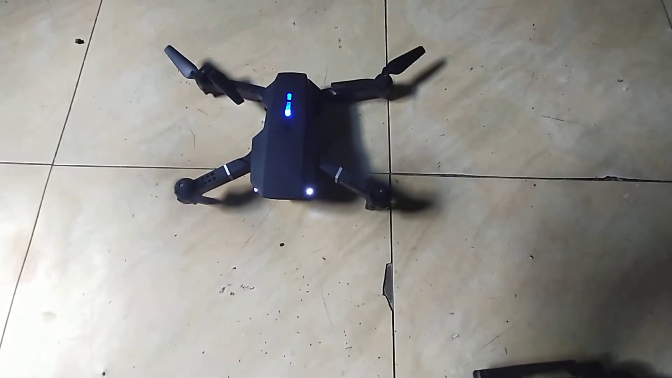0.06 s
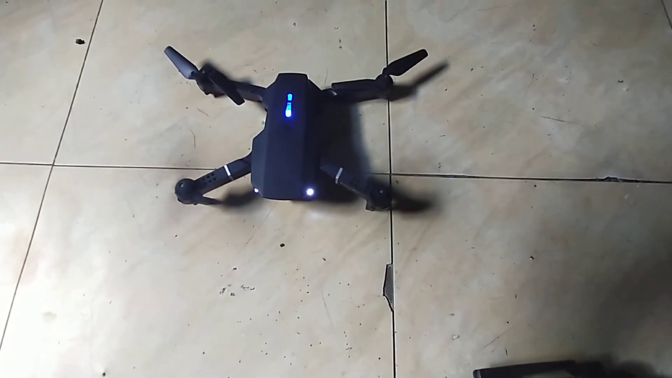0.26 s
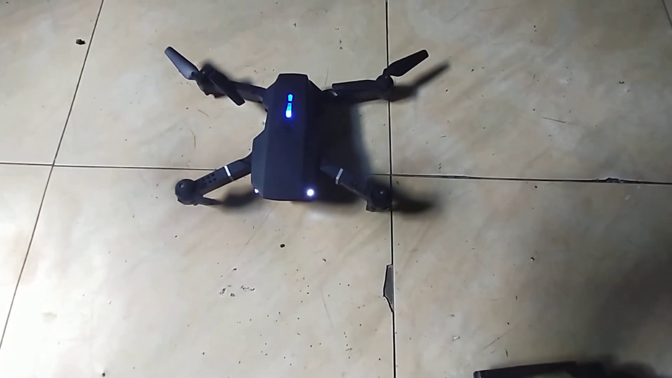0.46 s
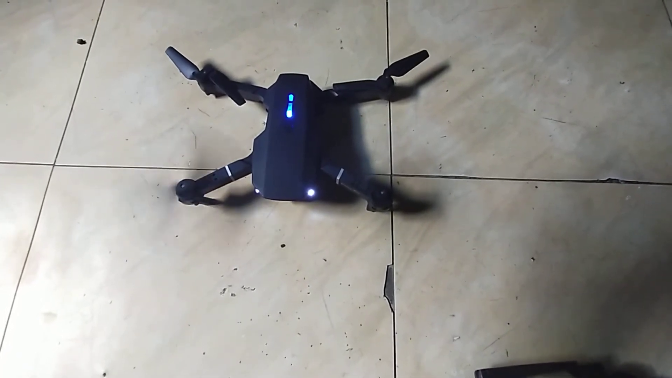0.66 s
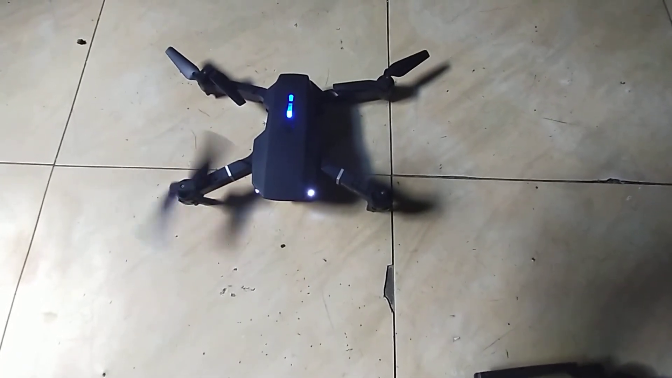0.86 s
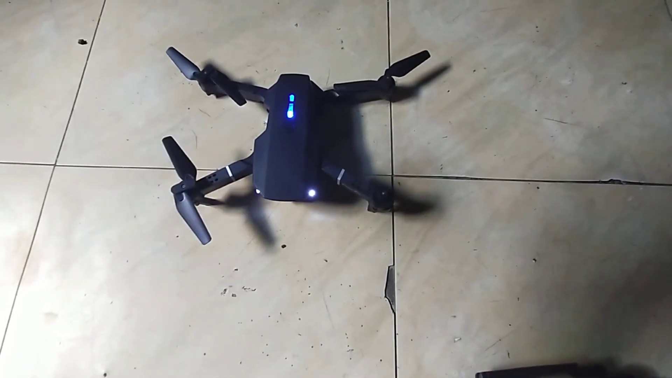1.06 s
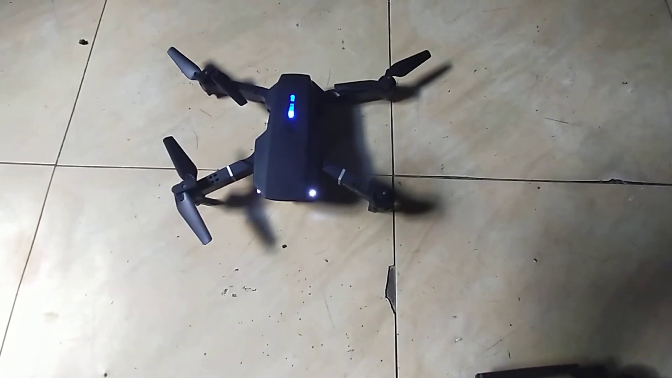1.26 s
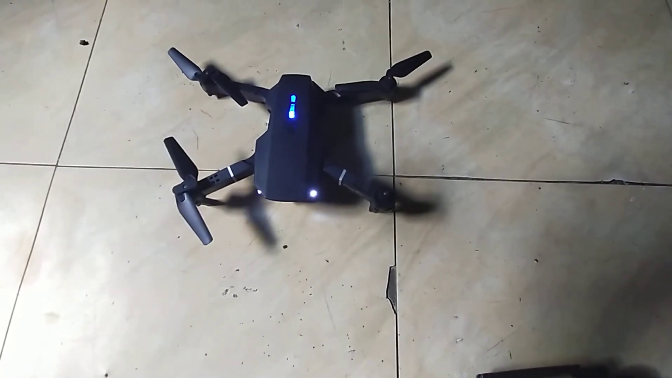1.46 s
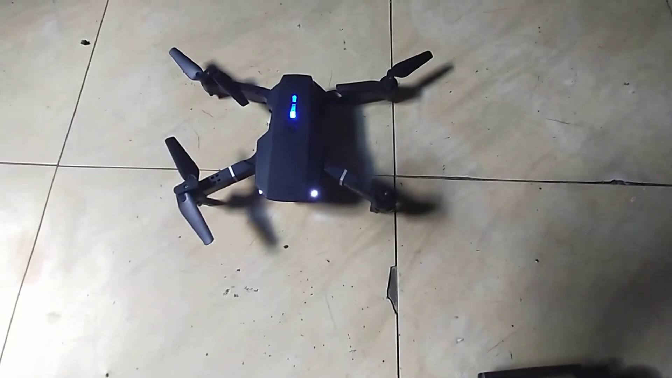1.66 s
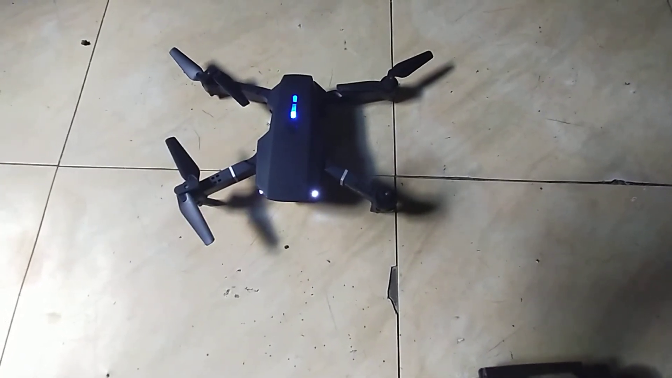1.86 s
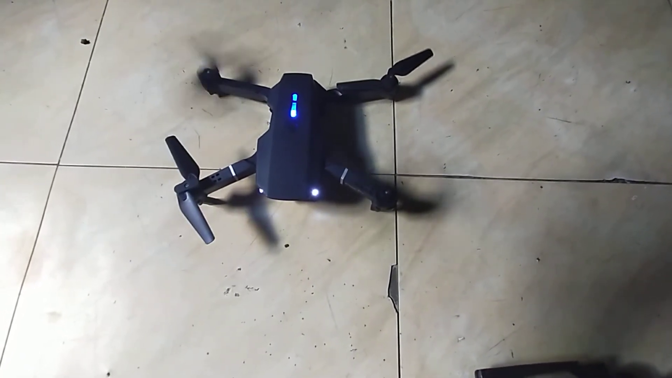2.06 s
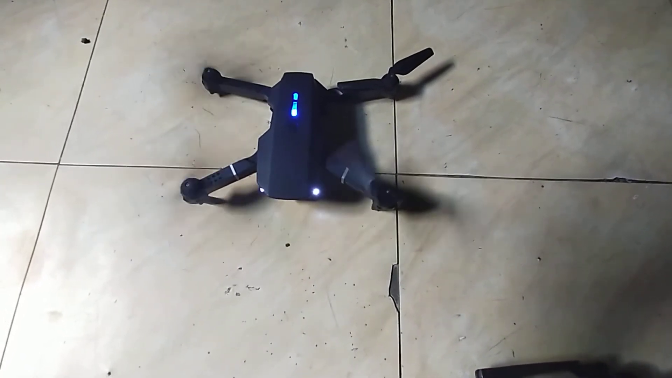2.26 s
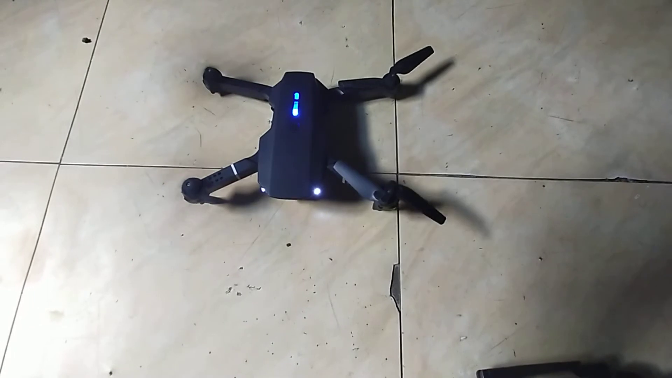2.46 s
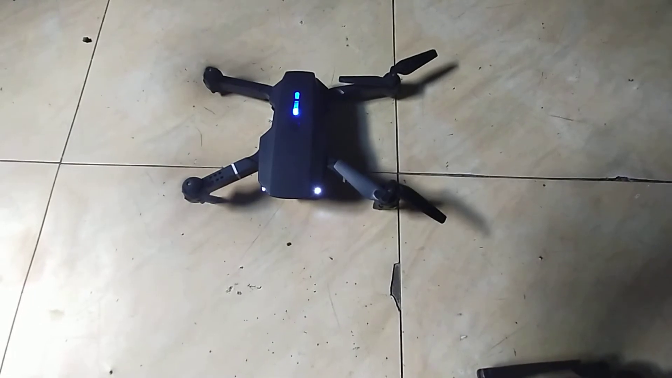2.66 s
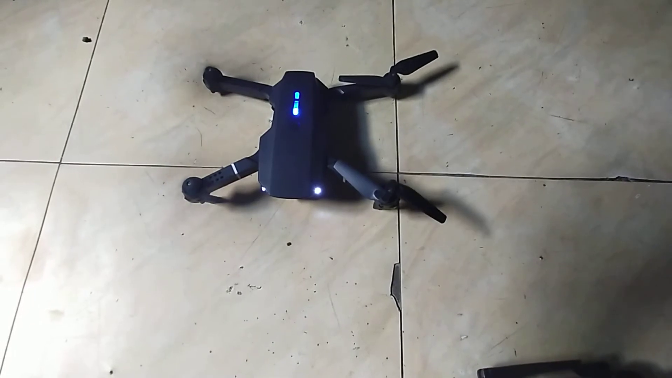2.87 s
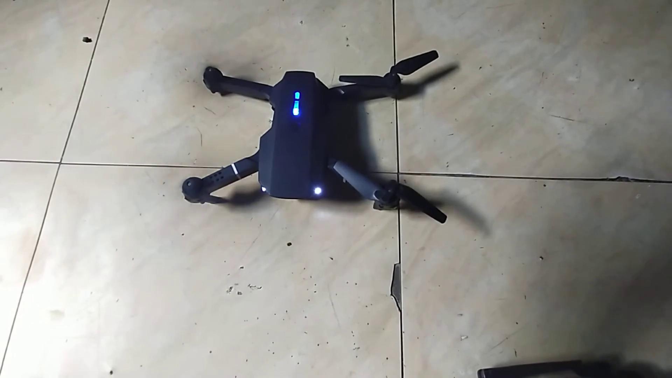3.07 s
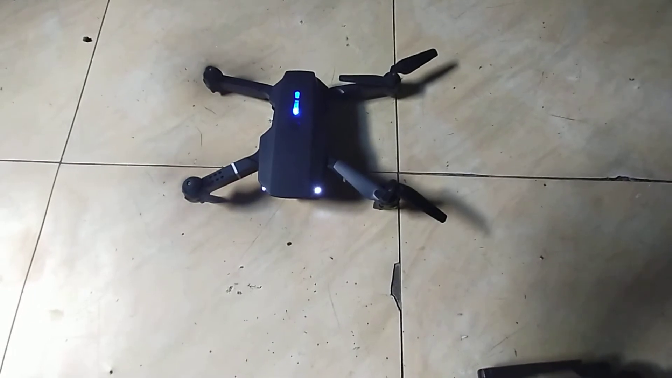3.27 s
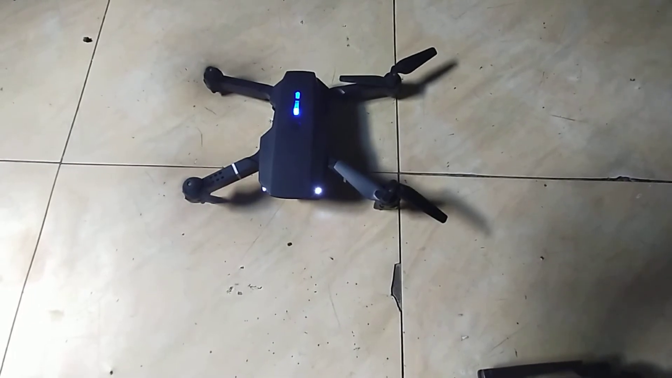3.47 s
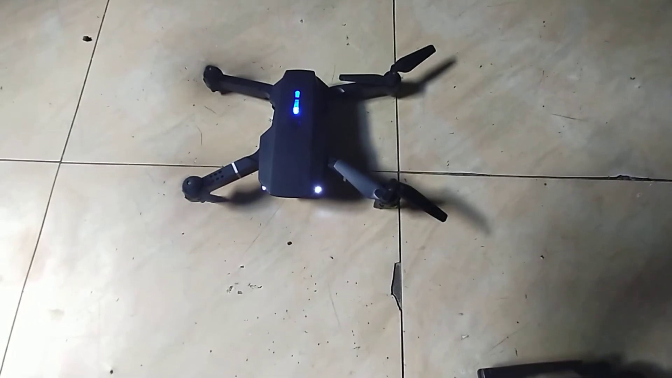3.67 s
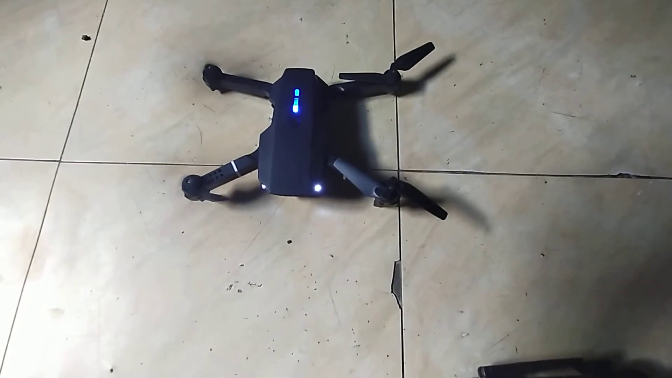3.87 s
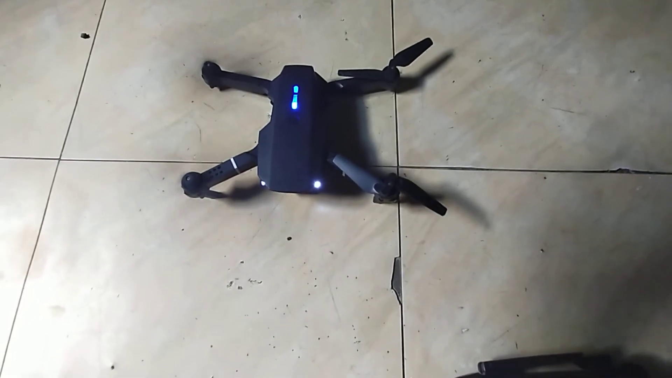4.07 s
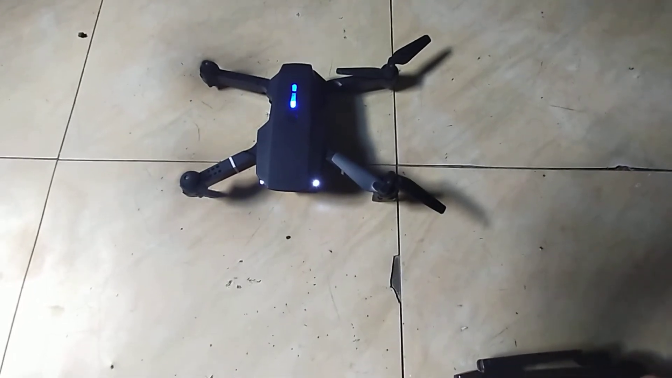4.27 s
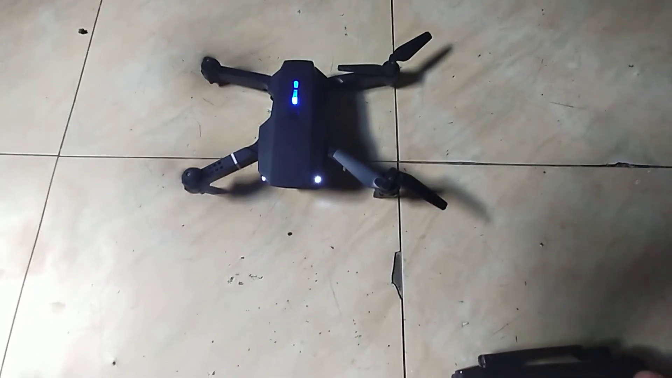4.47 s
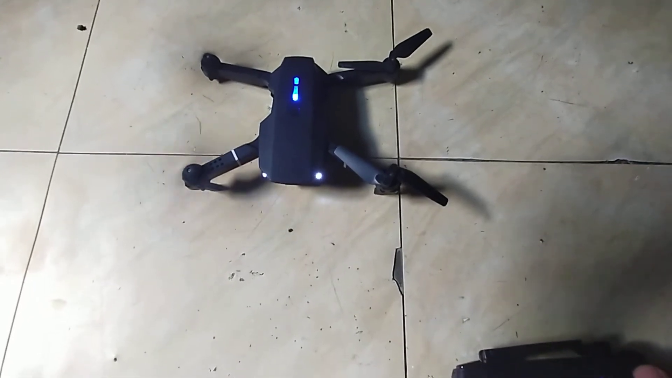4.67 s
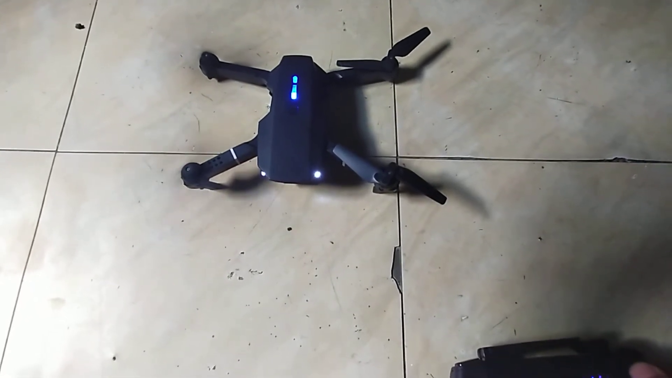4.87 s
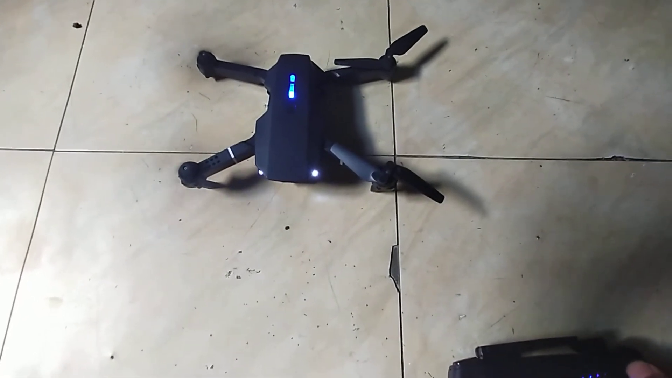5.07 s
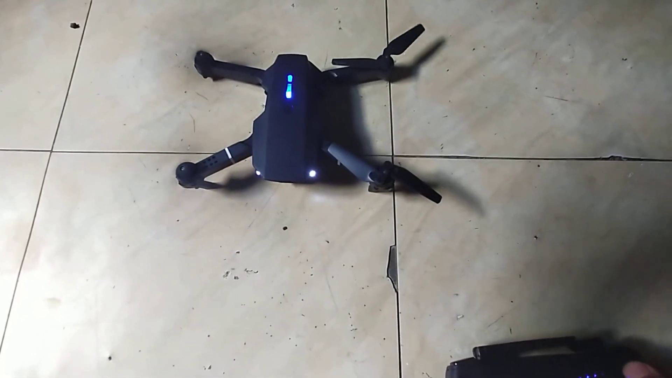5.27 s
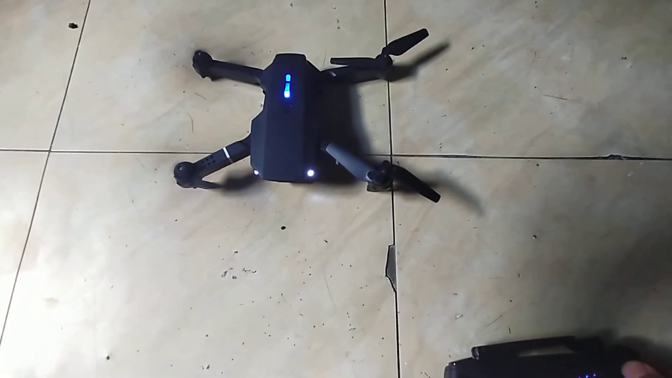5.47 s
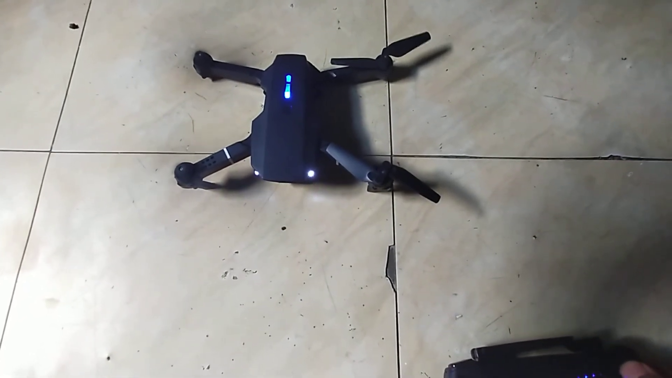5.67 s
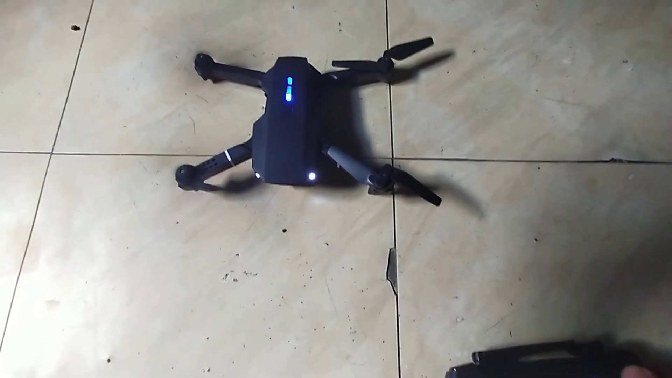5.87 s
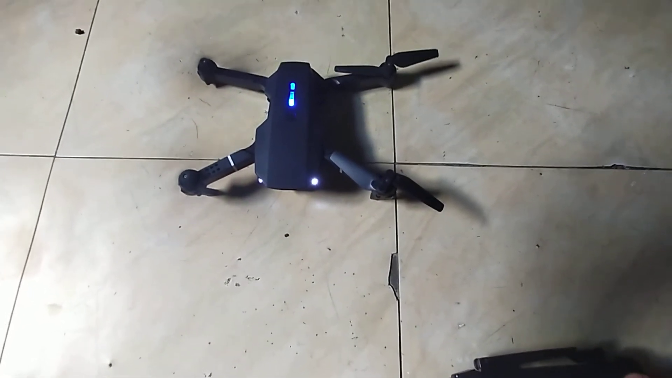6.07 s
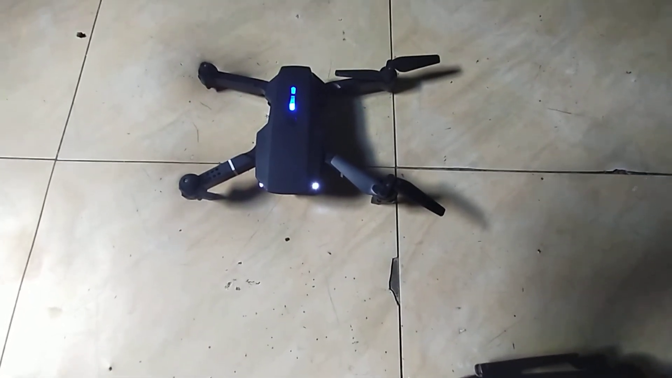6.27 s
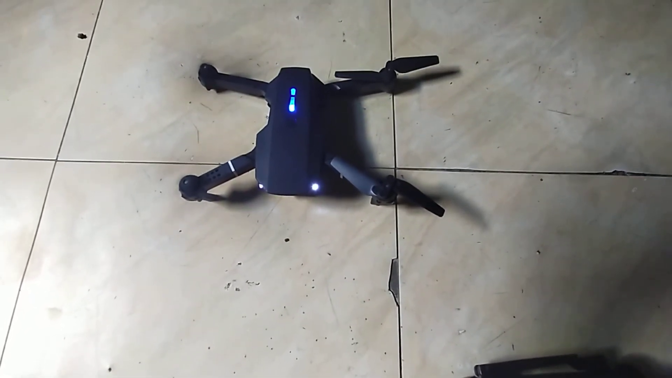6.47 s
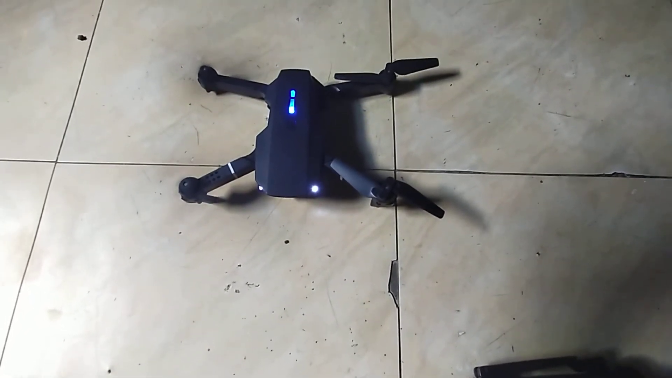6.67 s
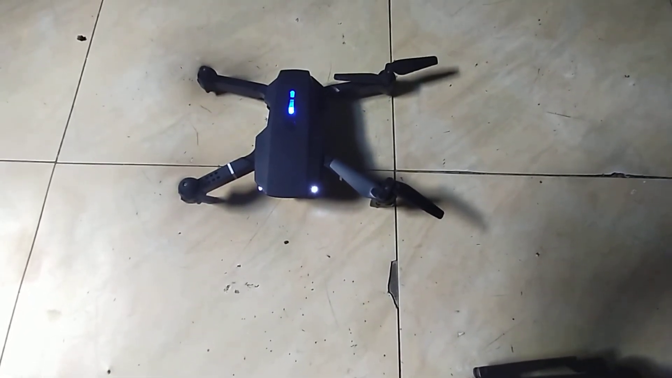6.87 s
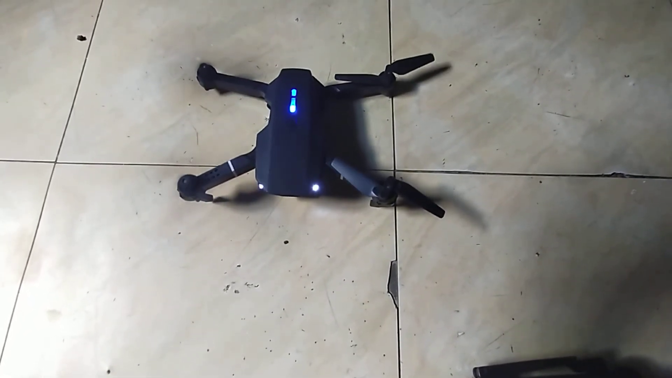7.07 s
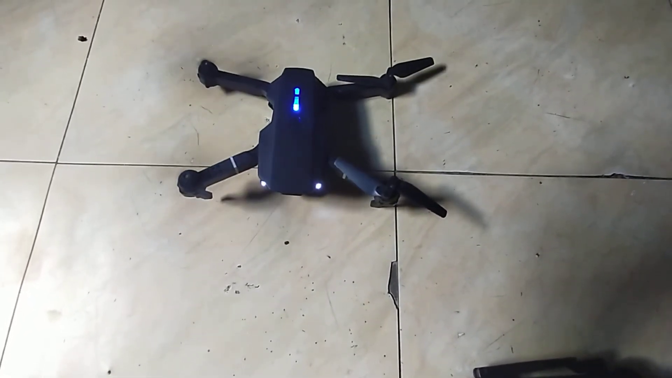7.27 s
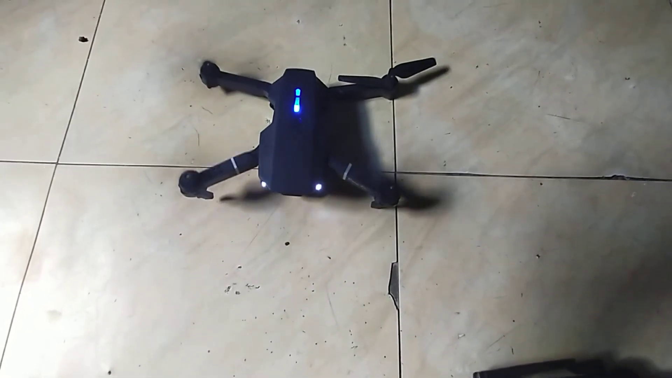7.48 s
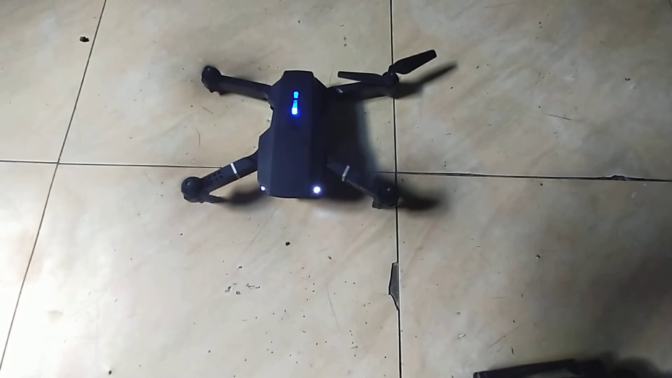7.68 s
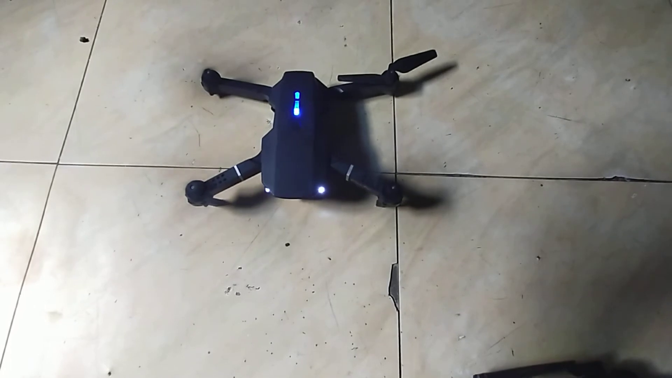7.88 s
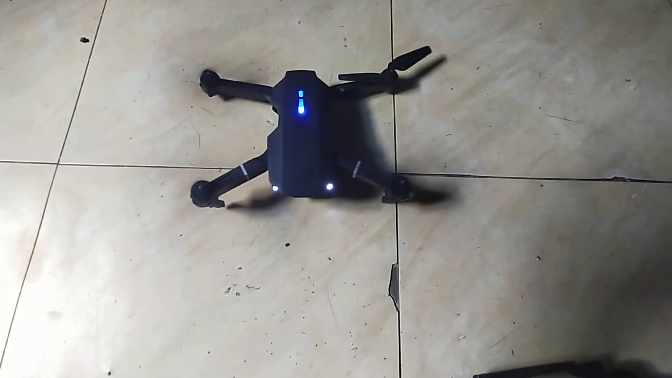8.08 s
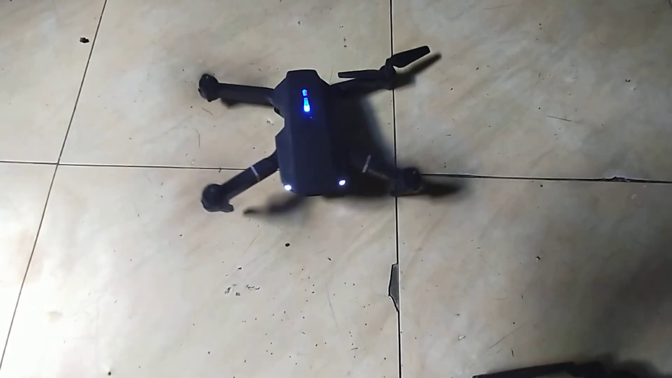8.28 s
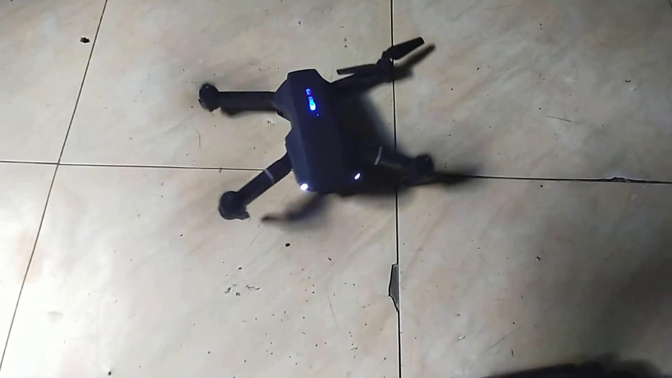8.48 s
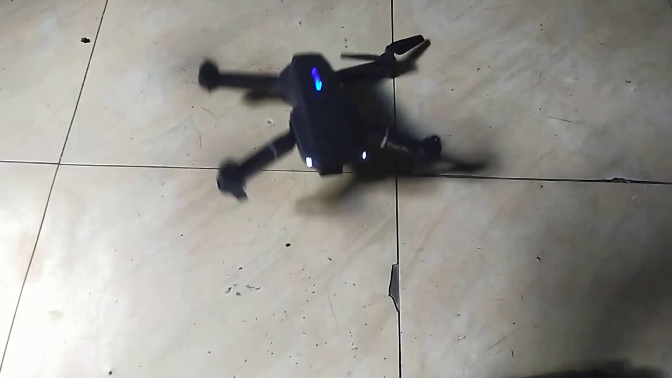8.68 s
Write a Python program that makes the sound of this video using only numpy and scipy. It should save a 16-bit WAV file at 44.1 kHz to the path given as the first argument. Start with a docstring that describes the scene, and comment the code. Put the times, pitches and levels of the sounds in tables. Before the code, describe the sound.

A toy drone's small geared motors whine and rasp unevenly indoors, winding down, knocking, idling and revving up again.

```python
"""Toy quadcopter on a tiled floor

A small hard room, one mono microphone close to a drone that runs its geared motors unevenly.
One rotor winds down, the drive knocks, a second idles and revs, a quiet third joins, and the first
restarts as the drone tips up. Blades hum, gear teeth whine and rasp in the plastic shell under a thin
treble fizz, and the room answers briefly behind them."""
import sys
import numpy as np
from scipy import signal
from scipy.fft import rfft, irfft, next_fast_len
from scipy.io import wavfile
from scipy.ndimage import uniform_filter1d, map_coordinates

SR = 44100
rng = np.random.default_rng(int(sys.argv[2]) if len(sys.argv) > 2 else 0)


def file_out(sig):
    """Save sig as 16-bit WAV at sys.argv[1]."""
    # one column per channel
    cols = np.atleast_2d(sig).T
    # limit, then scale
    lim = np.clip(cols, -1, 1)
    pcm = np.round(lim * 32767).astype(np.int16)
    wavfile.write(sys.argv[1], SR, pcm)


N = 385434

# Spectra of the gears' dull wash, the teeth's rasp and the treble fizz: (frequency [Hz], level [dB])
WASH_SPECTRUM = [(50, -21), (130, -5), (300, -6), (550, -10), (800, 4), (1050, 4.5), (1300, 7.5),
                 (2300, 2.5), (3500, 0.5), (6000, -72)]
RASP_SPECTRUM = [(60, -55), (900, -28), (2000, 4), (2900, 2), (3700, 7), (4150, 1.5), (4900, 4),
                 (5800, -1.5), (6700, 3.5), (7250, 11.5), (7900, 10.5), (8400, -17.5), (9300, -19),
                 (12000, -18)]
FIZZ_SPECTRUM = [(50, -44), (300, -0.5), (4000, 10), (8500, 9), (11000, -2), (13000, 3.5), (14500, 6),
                 (15700, 12.5)]
# Buzz of a powered but stalled motor: (time [s], level [dB])
STALL_BUZZ = [(2, -73), (2.17, -62), (2.21, -45.5), (2.33, -47), (2.39, -35.5), (2.44, -100)]

KNEE_TURNS_PER_S, KNEE_POWER = 58.63, 5.4  # below this speed a gear train falls quiet, this steeply
FULL_PULL = 175  # acceleration [turns/s^2] that presses the teeth of a slow rotor hard together
BACKLASH_TURNS = .0008  # how far a gear runs ahead and behind
TIP_S, TIP_TIME_S, SQUEAL_S = 7.6, .12, 7.96  # the drone tips up, how gradually; a gear starts to squeal


def rotor(steps, tones, arm, mesh, overtones, *, flutter_db, whine_db, overtone_db, load_db, hum_db,
          hum_tilt_db, teeth_db, grind_db, push=1.72, start_speed=0, strain_db=0, tipped_db=0,
          squeal_db=0, grip=1):
    """A two-blade propeller on a 32-tooth gear, driven by a motor that turns four times as fast."""
    # Partials of the propeller: (multiple of the turn rate, level [dB])
    blade_partials = [(2, -2.5), (3, -23), (4, -5), (5, -26), (6, -10.5), (7, -24.5), (8, -17.5),
                      (10, -21.5)]
    t = np.arange(N) / SR
    speed = spin(steps, start_speed)
    effort = 1 - 1 / (1 + (np.abs(speed) / KNEE_TURNS_PER_S) ** KNEE_POWER)
    pull = uniform_filter1d(np.maximum(np.gradient(speed) * SR, 0), size=900) / FULL_PULL
    load = np.tanh((1 - effort) * pull)  # speeding up loads the teeth
    turn = np.cumsum(speed) / SR
    backlash = BACKLASH_TURNS * (wobble(45) + .5 * wobble(300))
    gear_turn = turn + backlash
    tipped = .5 + .5 * np.tanh((t - TIP_S) / TIP_TIME_S)
    squealing = uniform_filter1d(1.0 * (t > SQUEAL_S), size=2000)

    blades = per_turn(turn, [(k, db + hum_tilt_db * np.log2(k / 2)) for k, db in blade_partials])
    waver_db = (1.3 + 2 * tipped) * wobble(22)  # deeper once the drone rocks on its feet
    hum = amp(hum_db + waver_db) * (np.abs(speed) / 60) ** push * blades  # faster blades push harder

    gear = amp(load_db * load + tipped_db * tipped) * per_turn(gear_turn, mesh)
    gear += amp(overtone_db + squeal_db * squealing) * per_turn(gear_turn, overtones)
    whine = shaped(grip * effort * amp(whine_db + flutter_db * wobble(40)) * gear, arm)

    grind = effort * amp(grind_db + 6.9 * load)
    shake_db = strain_db * np.tanh(pull) + flutter_db * wobble(25)  # revving shakes the shell harder
    shake = grip * grind * amp(shake_db) * per_turn(gear_turn, tones)
    contact = grind * amp(teeth_db)
    ridges = contact * teeth(turn + .3 * backlash)
    stroke = np.cos(4 * np.pi * turn) + np.cos(2 * np.pi * turn)  # two blades, and their imbalance
    return np.array([hum, whine, shake, ridges, contact * stroke, grind ** 2])


def rotor_runs():
    """Four runs of three rotors: one winds down and later restarts, one idles and revs, one joins."""
    # Throttle steps: (time [s], target speed [turns/s], lag [s])
    first_steps = [(0, 74.5, .16), (.19, 49.5, .275), (.71, 47.6, .085), (1.03, 44.9, .15), (1.36, 0, 1.4)]
    main_steps = [(2.325, 75.4, .085), (2.803, 28.1, 1.652), (3.21, 58.47, .128), (4, 58.16, .144),
                  (4.44, 58.7, .173), (5.03, 64, .09), (5.15, 76.97, .418), (5.846, 78.6, .116),
                  (6.295, 80, .046), (6.887, 101.6, .422), (7.288, 113.2, .25), (7.545, 60, .17),
                  (7.79, 90, .19), (8.09, 87.8, .025), (8.2, 86.6, .07), (8.337, 93.7, .01),
                  (8.4, 96, .045), (8.555, 112, .12), (8.63, 128, .05)]
    restart_steps = [(7.615, 98, .125), (7.795, 88, .033), (8.1, 80.4, .13), (8.33, 80, .04)]
    quiet_steps = [(5.331, 65.7, 0.517), (6.958, 68.9, 0.1), (7.75, 60, 0.1)]
    # Tones with which the motors shake the shell: (multiple of the turn rate, level [dB])
    first_tones = [(20, 10.5), (24, -20), (28, 2), (36, 9), (44, 3)]
    main_tones = [(16, -5), (20, 4), (21, -9), (24, -.5), (28, -3), (29, -7), (36, -7), (37, -10), (39, -9),
                  (40, -13), (44, -6)]
    restart_tones = [(20, 2), (24, -12), (28, 6), (32, 8)]
    # Arm resonances that give off the whine, first run and later runs: (frequency [Hz], gain [dB])
    first_arm = [(1000, -12), (1330, -22), (1470, 6.5), (1535, 1.5), (1600, -8.5), (1750, 5), (1830, -11),
                 (1890, -1.5), (2020, -12), (2110, 2), (2230, -16), (2370, 0.5), (2440, -12.5), (2780, -14),
                 (3050, -7), (3280, -1), (3850, 0), (4150, -15), (5200, -6)]
    arm = [(1000, -12), (1300, -10), (1500, 4), (1620, -5), (1790, 1), (1875, 2), (1950, -5), (2020, -6),
           (2110, -11), (2200, -3), (2330, -2), (2510, -12), (2780, -9), (3050, -5), (3350, 0.5), (3760, 1),
           (4150, -9), (4600, -4), (5100, -8), (5600, -2), (6150, 0), (6650, -3), (7300, 4), (7900, 2),
           (8400, -20)]
    # Gear tones and overtones, first run and later runs: (multiple of the turn rate, level [dB])
    first_mesh = [(28, -12), (31, -6), (32, 0), (33, -8), (36, -14)]
    first_overtones = [(60, -8), (64, -2), (65, 0), (66, -6), (68, -2), (69, -7)]
    mesh = [(29, -12), (31, -3), (32, 0), (33, -11), (36, -11)]
    overtones = [(56, -11), (58, -13), (60, -8), (61, -10), (62, -12), (63, -12), (64, 0), (65, -14),
                 (66, -15), (68, -7), (88, -8), (92, -6), (98, -4), (100, -3), (104, -3)]
    first = rotor(first_steps, first_tones, first_arm, first_mesh, first_overtones,
                  flutter_db=.7, whine_db=-28, overtone_db=-20, load_db=0, hum_db=-59, hum_tilt_db=0,
                  teeth_db=-7, grind_db=0, push=3.1, start_speed=80)
    main = rotor(main_steps, main_tones, arm, mesh, overtones,  # tipping up eases this gear
                 flutter_db=1.3, whine_db=-35.5, overtone_db=-12, load_db=11, hum_db=-54.5,
                 hum_tilt_db=1.37, teeth_db=-7.5, grind_db=1.5, tipped_db=-6.5, squeal_db=9.5)
    restart = rotor(restart_steps, restart_tones, arm, mesh, overtones,
                    flutter_db=2, whine_db=-37, overtone_db=-12, load_db=1, hum_db=-55.5,
                    hum_tilt_db=-1.5, teeth_db=-13.5, grind_db=1.5, strain_db=8.5, grip=slipping_grip())
    quiet = rotor(quiet_steps, main_tones, arm, mesh, overtones,
                  flutter_db=5, whine_db=-51.5, overtone_db=5, load_db=9, hum_db=-63,
                  hum_tilt_db=2.5, teeth_db=-9, grind_db=-4)
    return first + main + restart + quiet


def spin(steps, speed):
    """Turns per second: the rotor's inertia makes it lag behind each throttle step."""
    out = np.full(N, float(speed))
    starts = [max(0, round(s * SR)) for s, _, _ in steps]
    for start, end, (_, target, lag_s) in zip(starts, starts[1:] + [N], steps):
        out[start:end] = target + (speed - target) * np.exp(-np.arange(end - start) / SR / lag_s)
        speed = out[end - 1]
    return out


def teeth(turn):
    """Uneven teeth scratch alike on each turn; every fourth partial is the motor's and stands out."""
    multiple = np.arange(11, 150)
    db = 3.5 * (multiple % 4 == 0) + 1.5 * rng.standard_normal(len(multiple))
    return unit(per_turn(turn, np.column_stack([multiple, db])))


def slipping_grip(slip_db=-15, half_catch_s=.0045):
    """Grip of a gear that is jerked into motion: its teeth slip, and bite only in brief catches."""
    # Catches of the teeth: (time [s], level [dB])
    catches = [(7.679, 2), (7.698, -1), (7.735, 1), (7.757, 2), (7.779, 3), (7.795, 1.5), (7.816, 0),
               (7.833, 1.5), (7.857, 3)]
    t = np.arange(N) / SR
    slipping = uniform_filter1d(1.0 * ((t > catches[0][0]) & (t < catches[-1][0])), size=400)
    bites = sum(amp(db) * np.exp(-((t - s) / half_catch_s) ** 2) for s, db in catches)
    return amp(slip_db * slipping) + bites


def drives():
    """Blade hum and machinery noise: teeth and blade strokes shake the shell, louder with effort."""
    # Colour of the blade hum at the microphone: (frequency [Hz], gain [dB])
    hum_response = [(45, -22), (90, -5.5), (120, -4), (148, -2.5), (162, -0.5), (178, 5.5), (200, 3),
                    (235, 1.5), (290, 1.5), (345, -1), (400, 6), (440, 2.5), (500, -2.5), (620, 5.5),
                    (800, 11.5)]
    hum, whine, shake, ridges, stroke, power = rotor_runs()
    grind = np.sqrt(power) + 1e-4
    ridges, stroke = 1.1 * ridges / grind, stroke / grind
    machinery = (whine + gear_wash(grind, ridges, stroke) + shell_rattle(shake, grind, ridges, stroke)
                 + tooth_rasp(grind, ridges, stroke) + treble_fizz(grind, stroke))
    return shaped(hum, hum_response), machinery


def scrape(stroke, depth_db):
    """Scraping noise that swells with each blade stroke and flickers at random."""
    return unit(amp(depth_db * stroke + 1.8 * wobble(90)) * rng.standard_normal(N))


def gear_wash(grind, ridges, stroke):
    """Midrange noise of the running gears, also stirred up by a stalled motor."""
    level = amp(-40.5) * grind + amp(-1.5) * envelope(STALL_BUZZ)
    return level * coloured(.5 * ridges + scrape(stroke, depth_db=-1), WASH_SPECTRUM)


def shell_rattle(shake, grind, ridges, stroke, bypass_db=-22):
    """Motor tones and scraping teeth ring the shell; a little of the tones bypasses it."""
    scratching = 1.52 * grind * unit(shell(.5 * ridges + scrape(stroke, depth_db=7)))
    return amp(-48.5) * (shell(shake) + amp(bypass_db) * shake + scratching)


def tooth_rasp(grind, ridges, stroke):
    """The teeth ring brightly over their own scraping, pulsing with the blades."""
    ringing = ridges * amp(5 + 2 * stroke)
    return amp(-39) * grind * coloured(ringing + scrape(stroke, depth_db=5), RASP_SPECTRUM)


def treble_fizz(grind, stroke):
    """Thin, spiky high hiss while the rotors run, swelling and dropping in spells."""
    # Spells of more or less fizz: (middle [s], half length [s], gain [dB])
    spells = [(0.61, 0.62, 0.5), (4.3, 0.33, 4.5), (4.9, 0.42, -10), (5.8, 0.37, 2.5), (8.054, 0.13, 0),
              (8.459, 0.2, -13)]
    t = np.arange(N) / SR
    spikes_db = 4 * np.minimum(rng.exponential(size=N), 6)
    hiss = amp(spikes_db) * scrape(stroke, depth_db=5.5)
    spells_db = sum(db * np.exp(-((t - s) / half_s) ** 2) for s, half_s, db in spells)
    return amp(-41 + spells_db) * grind ** .37 * np.tanh(6 * grind) * coloured(hiss, FIZZ_SPECTRUM)


def shell(x):
    """x rung through the resonances of the plastic shell, alternating in polarity."""
    # Modes of the shell: (frequency [Hz], width [Hz], gain [dB])
    modes = [(1188, 96, -0.5), (1325, 49, 5.5), (1481.6, 57, 8), (1717, 5.5, 9), (1790, 66, 2),
             (2140, 116, 2.5), (2340, 38, 6.5), (2675, 32, -1.5), (2850, 27, -38), (3190, 35, -8),
             (3785, 51, 0.5)]
    return filtered(x, lambda f: sum(
        (-1) ** k * amp(db) * 1j * f * width / (hz * hz - f * f + 1j * f * width)
        for k, (hz, width, db) in enumerate(modes)))


def knocks(t60_s=.067, body_db=-6.5):
    """Ticks of a slowing rotor and knocks of a catching drive scrape in, ring the shell and crack."""
    # Knocks: (time [s], level [dB], relative crack level [dB], time to rise by 60 dB [s])
    hits = [(1.8935, -42, -22, .004), (1.921, -44, -21, .004), (2.192, -36.5, -9, 0.038),
            (2.2117, -29.5, -6.5, .006), (2.236, -34, -5, .02), (2.361, -27, -6.5, 0.08),
            (2.408, -38, 0, 0.023), (7.58, -23, -16, 0.045)]
    out, t = np.zeros(N), np.arange(N) / SR
    body = unit(unit(shell(rng.standard_normal(N))) + noise(WASH_SPECTRUM))
    crack = noise(RASP_SPECTRUM) + amp(4) * noise(FIZZ_SPECTRUM)
    for s, level_db, crack_db, rise_s in hits:
        shape_db = -60 * np.maximum((t - s) / t60_s, (s - t) / rise_s)
        out += amp(level_db + shape_db) * (amp(body_db) * body + amp(crack_db) * crack)
    return out


def coasting_chatter(rate_hz=38, depth=.98):
    """The slowing rotor's loose teeth chatter against the shell at a steady rate and fade."""
    # Fade of the chatter: (time [s], level [dB])
    fade = [(0, -40), (.7, -43.5), (1.3, -43.5), (1.6, -48), (1.8, -59), (2.1, -63.5), (2.3, -120)]
    flutter = 1 + depth * np.cos(2 * np.pi * rate_hz * np.arange(N) / SR)
    return envelope(fade) * unit(shell(flutter * rng.standard_normal(N)))


def motor_coils():
    """Fuzzy tones of the powered motors: a buzz while stalled, then a thin high whistle."""
    # Course of the whistle: (time [s], level [dB])
    whistle_levels = [(2.2, -100), (2.25, -53.5), (3, -55), (5.2, -58), (7.3, -56.5)]
    buzz = envelope(STALL_BUZZ) * noise_band(hz=1170, half_width_hz=60)
    whistle = envelope(whistle_levels) * noise_band(hz=10430, half_width_hz=840)
    return buzz + whistle


def room(x):
    """Hard floor and walls answer after 5 ms; each frequency dies at its own speed."""
    # Reverberation: (frequency [Hz], time to fall by 60 dB [s])
    decay_times = [(150, 0.4), (1500, 0.22), (8000, 0.33)]
    hz, t, spectra = signal.stft(rng.standard_normal(SR // 2), SR, nperseg=256)
    decay = amp(-60 * t / along(decay_times, hz)[:, None])
    _, tail = signal.istft(spectra * decay, SR, nperseg=256)
    return signal.fftconvolve(x, np.pad(tail, (SR // 200, 0)) / np.linalg.norm(tail))[:N]


def room_tone():
    """Faint steady noise behind the drone."""
    # Background spectrum: (frequency [Hz], level [dB])
    spectrum = [(25, -52), (70, -12), (200, 2.5), (600, -10.5), (1400, 0), (2100, -18), (7500, -19),
                (10000, -33), (15000, -12)]
    return amp(-60.5) * noise(spectrum)


def amp(db):
    """Decibels to gain."""
    return 10 ** (np.asarray(db) / 20)


def unit(x):
    """Scale to rms 1."""
    return x / np.sqrt(np.mean(x ** 2) + 1e-20)


def along(points, hz):
    """Interpolate (frequency [Hz], value) points on a log axis."""
    knots_hz, values = np.transpose(points)
    return np.interp(np.log(hz + 1), np.log(knots_hz + 1), values)


def envelope(points):
    """Gain per sample from (time [s], level [dB]) points."""
    return amp(np.interp(np.arange(N) / SR, *np.transpose(points)))


def wobble(rate, hop=16):
    """A smooth random curve, rate knots a second."""
    at = np.arange(0, N + hop, hop)
    coarse = map_coordinates(rng.standard_normal(int(N * rate / SR) + 4), [at * rate / SR], order=2)
    return np.interp(np.arange(N), at, coarse)


def per_turn(turn, partials, size=4096):
    """A waveform of the given partials that repeats with each turn of the rotor."""
    multiple, db = np.transpose(partials)
    lines = np.zeros(size // 2 + 1, complex)
    lines[np.round(multiple).astype(int)] = amp(db) * np.exp(2j * np.pi * rng.random(len(db)))
    return np.interp(turn % 1 * size, np.arange(size), irfft(lines) * size / np.sqrt(2))


def filtered(x, response):
    """x through a response given as a function of frequency."""
    size = next_fast_len(N + SR // 2)
    return irfft(rfft(x, size) * response(np.fft.rfftfreq(size, 1 / SR)), size)[:N]


def shaped(x, spectrum):
    """x through a curve of (frequency [Hz], gain [dB]) points."""
    return filtered(x, lambda hz: amp(along(spectrum, hz)))


def coloured(x, spectrum):
    """x shaped by a spectrum, at rms 1."""
    return unit(shaped(x, spectrum))


def noise(spectrum):
    """Noise with a spectrum, at rms 1."""
    return coloured(rng.standard_normal(N), spectrum)


def noise_band(hz, half_width_hz):
    """Narrow noise around one pitch, at rms 1."""
    return unit(filtered(rng.standard_normal(N), lambda f: 1 / (1 + ((f - hz) / half_width_hz) ** 2)))


def scene():
    """The drone up close, its room and the quiet background, alike in both channels."""
    blades, machinery = drives()
    drone = machinery + motor_coils() + coasting_chatter() + knocks()
    mono = blades + amp(-2) * drone + amp(-10.5) * room(drone) + room_tone()
    return np.array([mono, mono])


def record(dry, top_hz=15750):
    """Nothing is kept above the band limit."""
    return np.array([filtered(x, lambda hz: hz < top_hz) for x in dry])


dry = scene()
out = record(dry)
file_out(out)
```